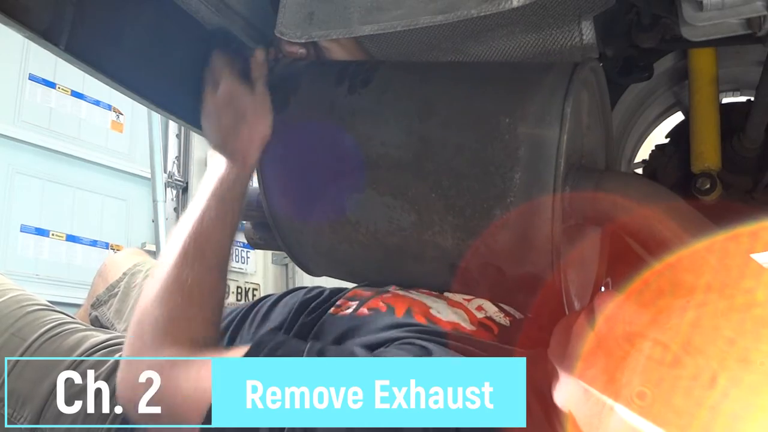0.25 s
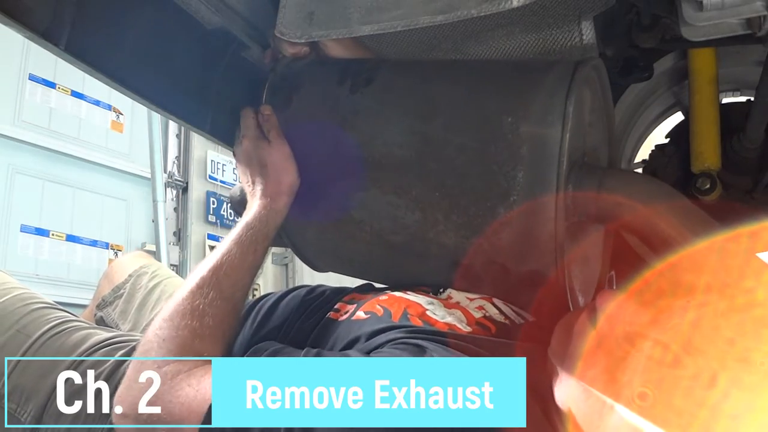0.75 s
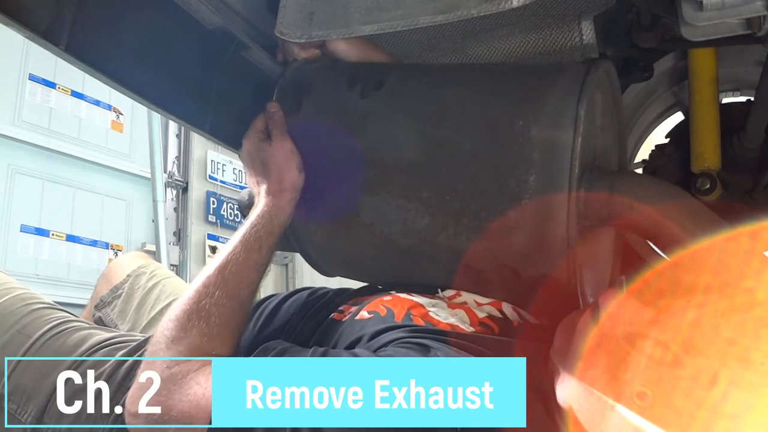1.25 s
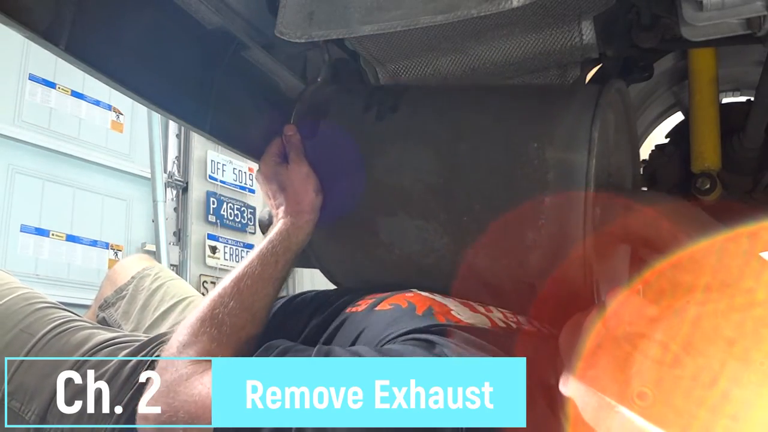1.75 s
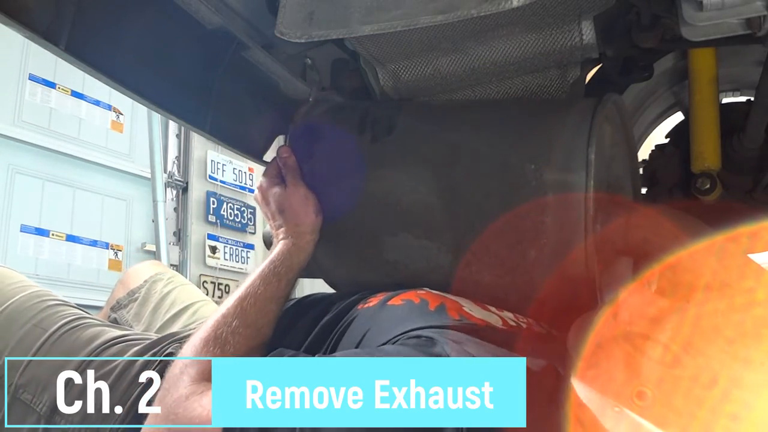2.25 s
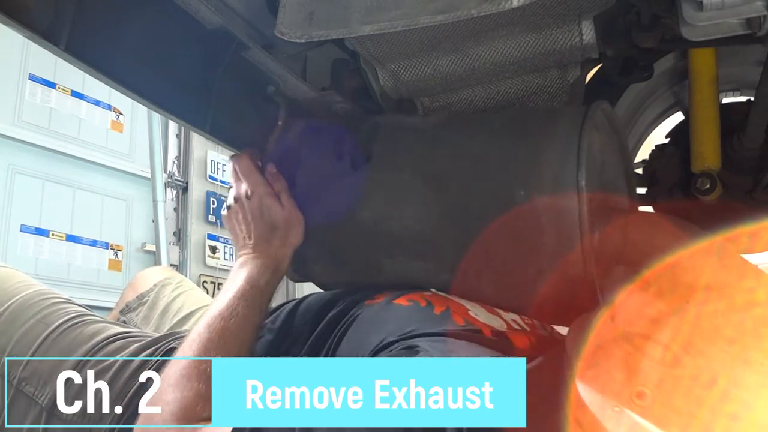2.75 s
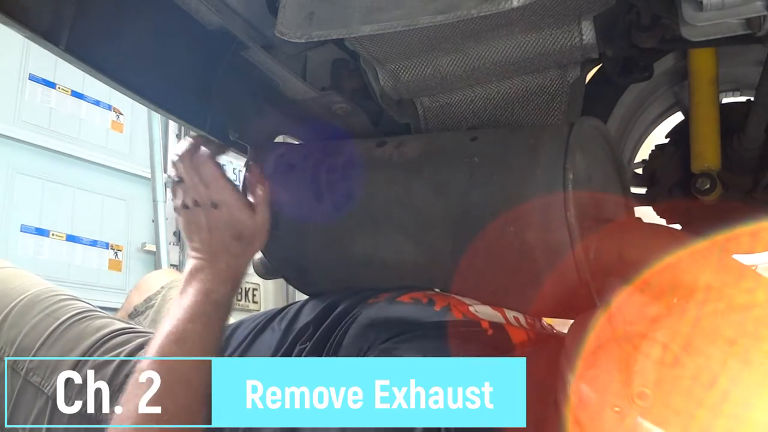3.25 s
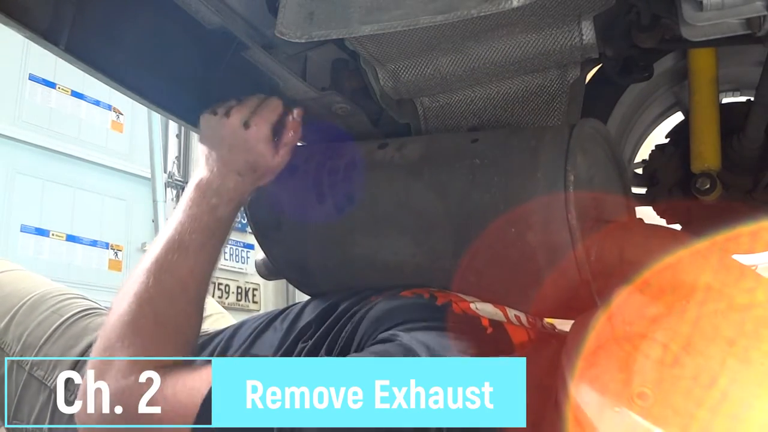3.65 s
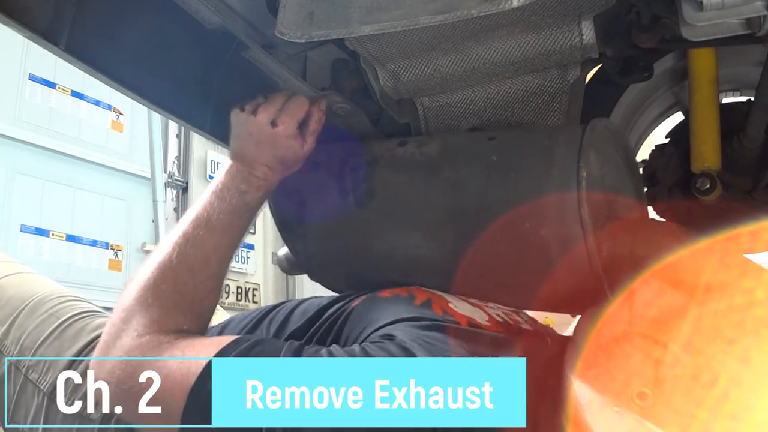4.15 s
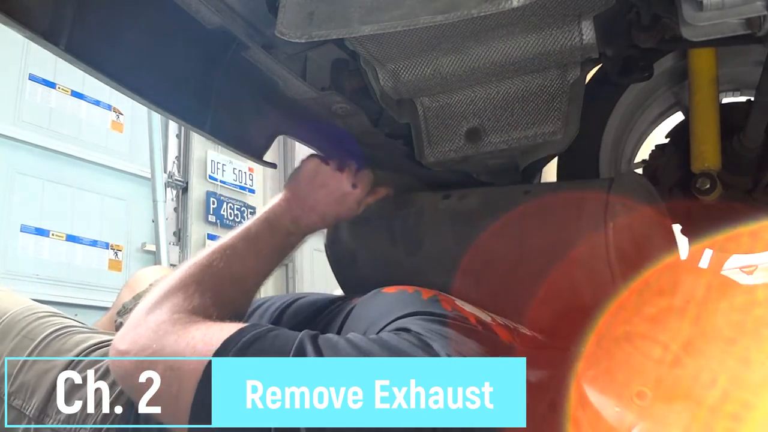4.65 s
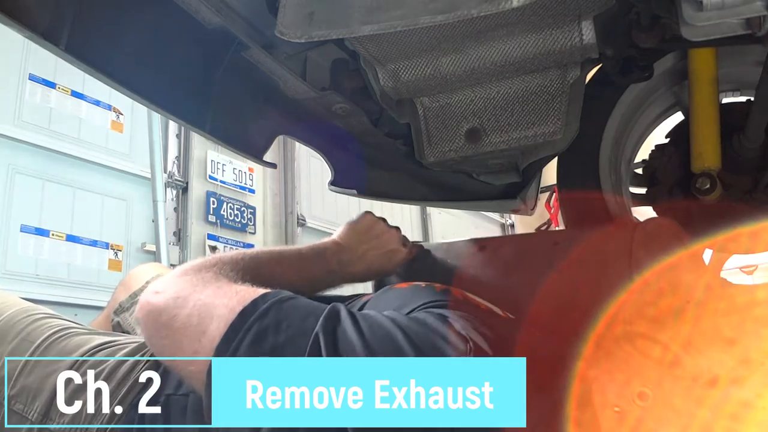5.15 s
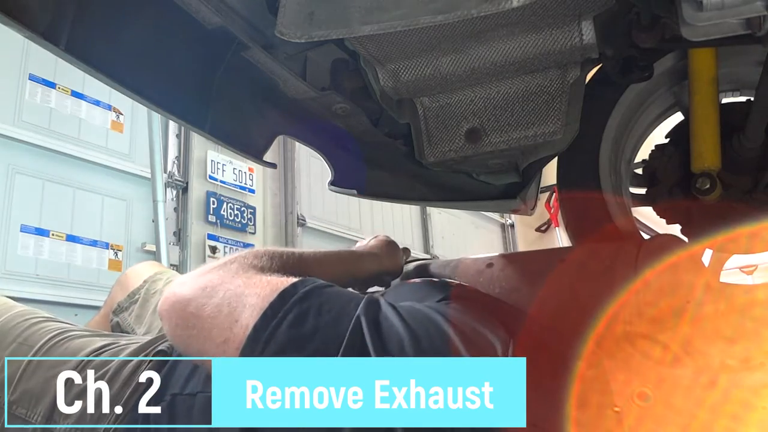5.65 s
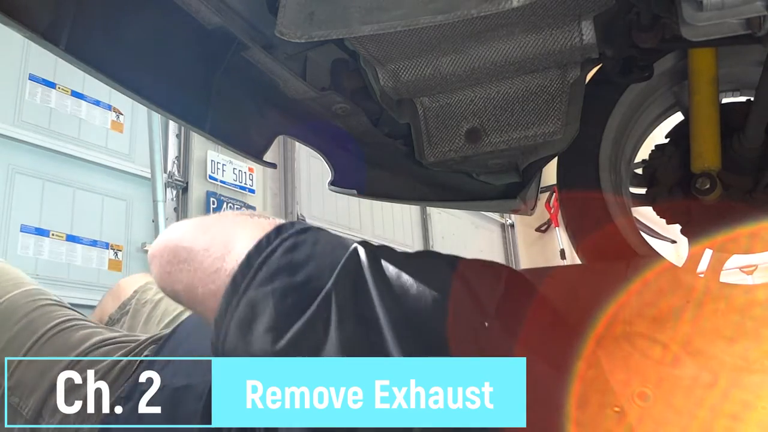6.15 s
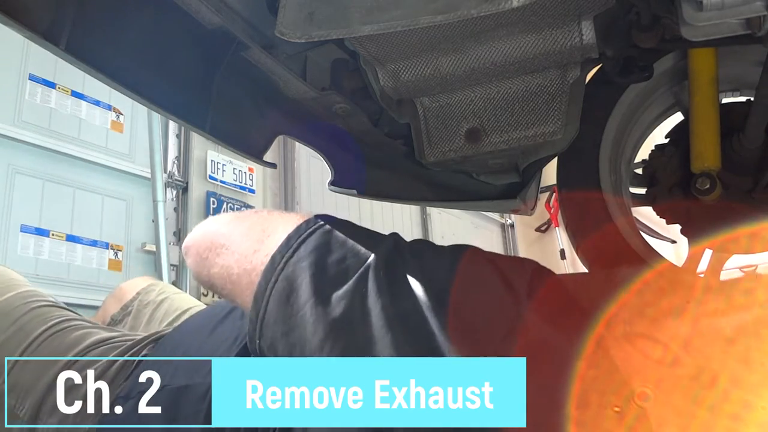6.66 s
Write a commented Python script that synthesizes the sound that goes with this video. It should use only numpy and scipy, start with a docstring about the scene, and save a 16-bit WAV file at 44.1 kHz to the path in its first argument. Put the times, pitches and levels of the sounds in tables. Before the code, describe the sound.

Close up in a garage, rusty metal rubs and rattles as a car's exhaust pipe is worked loose, with bursts of short steel clanks. The clanking gives way to a softer scraping hiss, then the muffler comes free with a low hollow bump. Metal squeaks briefly, and the muffler knocks and scrapes several times as it is set down. A low, steady room rumble lies underneath.

```python
"""Garage, under a raised car: an exhaust pipe and its muffler are worked loose.
Rust grains hiss in the sliding contact and drive the modes of pipe and muffler shell; blows clank
on both, and stick-slip makes single modes squeak. Hands knock the hollow muffler; it drops free,
the pipework shudders, and it is laid down at the end. The room adds low rumble and short reverb."""
import sys
import numpy as np
from scipy import signal
from scipy.fft import rfft, irfft, next_fast_len
from scipy.io import wavfile
from scipy.ndimage import uniform_filter1d

SR = 44100
rng = np.random.default_rng(int(sys.argv[2]) if len(sys.argv) > 2 else 0)


def to_wav(s):
    """Save 16-bit WAV."""
    ch = np.atleast_2d(s).T  # columns
    pcm = np.round(np.clip(ch, -1, 1) * 32767)  # PCM
    wavfile.write(sys.argv[1], SR, pcm.astype(np.int16))


N = 303849

# room tone: f/Hz, level/dB
RUMBLE_SPECTRUM = [(12, 0), (20, -2), (91, 1.5), (150, -3), (459, -14.5), (698, -17.5), (1120, -23.5),
                   (1290, -26.5), (2670, -33), (3250, -31), (3950, -35), (7000, -41.5), (16000, -45)]
# room tone, left-right likeness: f/Hz, correlation
RUMBLE_COHERENCE = [(60, 0.99), (500, 0.34), (2000, 0.59), (12000, 1)]
# reverb decay: f/Hz, t60/s
GARAGE_T60 = [(200, 1), (1000, 0.32), (4000, 0.4), (12000, 0.48)]
# loose pipework: f/Hz, level/dB
SHUDDER_SPECTRUM = [(40, -12), (80, 0), (220, 4), (500, -12), (1600, -19), (2500, -38), (16000, -80)]
# dull knocks on the muffler: t/s, level/dB, f/Hz, t60/s
KNOCKS = [(0.352, -31.5, 234, 0.076), (1.089, -30.5, 330, 0.071), (1.138, -31.5, 335, 0.078),
          (1.162, -27, 144.5, 0.13), (1.18, -29, 208, 0.048), (1.193, -20.5, 320, 0.058),
          (1.243, -18.5, 318, 0.056), (1.288, -30, 293, 0.038), (1.334, -28, 316, 0.035),
          (1.337, -34.5, 142, 0.2), (2.66, -38.5, 251, 0.22), (2.745, -38, 255, 0.27),
          (5.406, -32.5, 112, 0.14), (5.447, -29, 84, 0.095), (6.28, -41.5, 283, 0.13),
          (6.435, -35.5, 97, 0.13), (6.441, -32, 152, 0.17), (6.445, -25, 262, 0.11),
          (6.479, -22, 261, 0.16), (6.595, -34.5, 98.5, 0.25), (6.639, -30.5, 267, 0.17),
          (6.791, -33, 151, 0.19), (6.781, -23.5, 259, 0.23)]
# hollow muffler notes at the drop: f/Hz, level/dB, t60/s
HOLLOW_NOTES = [(64.6, -26.5, 0.096), (158.4, -25, 0.25), (197, -21.5, 0.12), (231, -33, 0.81),
                (305, -33, 0.21), (503, -29.5, 0.15), (680, -52, 0.27), (1116, -41, .15), (1440, -35, 0.24)]
# stick-slip notes: t/s, rise/(s per 20 dB), hold/s, fade/(s per 20 dB), f/Hz, level/dB
SQUEAKS = [(0.055, 0.1, 0.0044, 0.07, 2580, -48), (1.895, .01, 0.039, .06, 1860, -55),
           (1.965, -1, 0.053, -0.4, 3300, -53.5), (1.975, -1.7, 0.027, .04, 1840, -52),
           (2.037, -1.5, 0.016, 0.2, 1150, -52), (3.212, .08, 0.026, 0.12, 3210, -49),
           (3.233, .01, 0.013, 0, 644, -43), (3.246, 0.2, 0.03, 0.02, 1280, -49),
           (3.355, -0.5, 0.003, 0.07, 2090, -47), (3.37, -1, .05, 0.19, 2110, -68),
           (3.722, 0.0441, 0.039, 0.5, 3230, -62.5), (4.546, .006, .004, .01, 530, -43),
           (4.622, .035, .012, .03, 545, -41), (5.821, -0.2, 0.02, -0.4, 3150, -44.5),
           (5.841, 0.03, 0.066, .03, 690, -44), (5.89, .015, 0.1, 0.2, 1345, -36),
           (5.919, .007, .004, .006, 1350, -20), (5.954, .006, .002, .005, 1335, -20),
           (5.964, .008, .008, .02, 1335, -18.5), (5.96, .05, 0.15, 0.5, 522, -50.5),
           (6.136, .05, 0.19, 0.4, 3210, -51.5), (6.214, 4, 0.16, 1, 690, -49)]
# sudden slips: t/s, fade/(s per 20 dB), hiss/dB, pipe/dB, shell/dB
SKIDS = [(0.0, 0.14, -54, -55, -54), (0.595, 0.06, -49.5, -74.5, -80), (0.658, 0.11, -47.5, -42.5, -72),
         (0.821, 0.17, -47, -45, -58), (1.08, 0.4, -53.5, -58, -46), (1.166, 0.21, -41, -46, -37),
         (1.285, 0.1748, -50, -39, -40), (2.095, 0.37, -40.5, -32.5, -57), (2.15, 0.15, -35, -30, -38.5),
         (2.737, 0.42, -40, -33.5, -38), (2.82, 0.04, -35.5, -51, -41), (3.101, 0.04, -56, -56, -43.5),
         (3.6, 0.6, -66, -58.5, -56), (3.734, .13, -66, -68, -68), (5.334, 0.19, -51, -41.5, -39),
         (6.446, 0.22, -41.5, -43, -29), (6.594, 0.4, -66, -30, -22.5), (6.782, 0, -35, -50, -28),
         (6.872, -2, -54, -40, -40)]
# pushes that swell, hold and ease off: t/s, hold/s, hiss/dB, pipe/dB, shell/dB
STROKES = [(.206, .0, -60.5, -76, -79), (.386, .0, -62.5, -84, -80), (0.505, 0, -59, -85, -85),
           (1.554, .0, -57, -70, -69), (1.728, 0, -50, -50, -55), (1.842, 0.18, -57.5, -53.5, -66),
           (2.481, 0.043, -49.5, -40, -66), (2.647, 0.016, -46.5, -39, -43),
           (2.874, 0.075, -66, -41, -41.5), (3.198, 0.032, -51.5, -53, -47.5), (3.984, 0, -49.5, -54, -64),
           (4.088, 0.051, -43.5, -51.5, -74), (4.315, 0.0099, -48, -64, -53.5),
           (4.421, 0.48, -41, -56.5, -55), (4.57, 0.078, -43.5, -52, -63.5),
           (4.993, 0.19, -43, -55.5, -57.5), (5.823, 0.037, -51, -68, -46), (5.906, 0.083, -37.5, -34, -48),
           (6.143, 0.2, -50, -52.5, -47)]
# smooth metal in the contact, brighter than rust: t/s, share of hiss power
SMOOTH_SHARE = [(0, 0.2), (1, 0), (3.3, 0.6), (3.9, 0.16), (5.3, 0.7), (5.8, 0.02), (6.3, 0.47),
                (6.89, 0.8)]
# resonances of smooth sliding: f/Hz, width/Hz, level/dB
SMOOTH_BANDS = [(2120, 180, 9.5), (3230, 340, 10), (4000, 140, -7), (4900, 73, 9), (5780, 190, 4),
                (6800, 140, 4), (6700, 77, 1), (8160, 200, 2), (9140, 150, 3), (10470, 450, 1.5),
                (12100, 240, -2), (13800, 250, -5)]
# broad hiss under them: f/Hz, level/dB
SMOOTH_WASH = [(880, -22), (1500, -42), (3180, 14), (5770, 14.5), (13700, 8), (16000, 2)]
# hiss of rusty contact: f/Hz, level/dB
RUST_SPECTRUM = [(1060, -18), (1800, -17.5), (3060, -4), (3350, -3.5), (4740, -9.5), (7090, -12),
                 (16000, -29)]
# narrow bands ringing in that hiss: f/Hz, width/Hz, boost/dB
RUST_BANDS = [(2326, 49, 11.5), (2840, 27, 1.5), (4380, 39, 9), (5240, 50, 6), (5600, 63, 8),
              (6250, 110, 3), (6300, 32, 8), (7060, 27, -0.5), (8400, 57, 7.5), (9000, 70, 12)]
# modes of the thin pipe and the muffler shell: f/Hz, width/Hz, level/dB
PIPE_MODES = [(962, 8.5, -3), (1090, 65, 12), (1290, 16, 18), (1630, 84, -2), (2550, 150, 18),
              (2610, 80, 13.5), (1876, 48, 14.5), (3230, 250, 12), ]
SHELL_MODES = [(262, 16, -9), (323, 16, -14), (425, 12, -9), (455, 14, -8), (489, 12, -6), (541, 16, -4),
               (577, 12, -4), (664, 16, -2), (689, 12, 0), (862, 12, -7), (953, 14, -3), (1002, 18, -4),
               (1084, 20, -8), (1211, 20, -4), (1271, 20, -4), (1336, 24, -5)]
# their crowds of lesser modes: f/Hz, level/dB
PIPE_WASH = [(290, -36), (500, -23), (755, -13), (898, -0.5), (1820, 3), (2130, 1.5), (8840, -25.5),
             (12000, -39), (15600, -66), (22000, -120)]
SHELL_WASH = [(88, -14), (150, -13), (262, -5), (362, -4.5), (680, 0), (776, -6.5), (981, -4.5),
              (5000, -27), (6500, -76), (11000, -120)]
# crack of first contact: f/Hz, level/dB
TICK_SPECTRUM = [(1060, -34), (1800, -10.5), (3000, -2.5), (4740, -7), (7090, -10), (10000, -12.5),
                 (12500, -34), (16000, -27)]
# steel on steel: t/s, pipe level/dB, shell re pipe/dB, tick re pipe/dB, focus/Hz, grip t60/s
CLANKS = [(0.6489, -36.5, -32, 3.5, 1870, 0.31), (0.661, -33, -25, 2.5, 1300, 0.15),
          (0.7383, -37.5, -37, -5, 1860, 0.31), (0.8114, -35, 3.5, -30, 1230, 0.13),
          (1.0792, -38, -22, 6, 2600, 0.084), (1.1559, -25.5, -21, 11.5, 2690, 0.045),
          (1.2427, -27, -3, -23, 543, 0.097), (1.276, -15.5, -2.5, -18, 2350, 0.031),
          (1.3394, -32, 2.5, -5, 627, 0.11), (1.6868, -43, -20, 2, 1300, 0.1),
          (1.713, -41, -20, -5, 1900, 0.1), (1.7307, -41, -24, 8.5, 1900, 0.081),
          (1.8213, -41.5, -19, 1.5, 1340, 0.16), (1.8948, -43, -27, 1, 1850, 0.1),
          (1.9275, -39, -29, 0, 1830, 0.029), (1.969, -36, -27, -18, 1760, 0.12),
          (2.0155, -34, -20, -8, 1850, 0.08), (2.0873, -21.5, -48, 8, 2300, 0.056),
          (2.1492, -8, -20, -35, 1680, 0.093), (2.255, -26, -2.5, -3.5, 1290, 0.096),
          (2.327, -21, -33, -5, 1830, 0.18), (2.4511, -41, -24, -7, 1300, 0.055),
          (2.4885, -27, -34, -4.5, 1050, 0.082), (2.516, -31, -25, -1, 1850, 0.06),
          (2.5852, -28.5, -9, -4.5, 1350, 0.19), (2.6376, -44, -19.5, 1, 2400, 0.06),
          (2.6445, -30.5, -11, -2.5, 1280, 0.19), (2.7413, -18, -7, -33, 700, 0.068),
          (2.8086, -22, -4, -18, 1290, 0.08), (2.8205, -18, -6.5, -21, 1730, 0.11),
          (2.9258, -19, -9, -7, 1570, 0.05), (2.9966, -22.5, -19, -6, 1680, 0.1),
          (3.098, -39, -18, 2.5, 3170, 0.065), (5.3361, -21, -0.5, -17, 1580, 0.12),
          (6.4396, -23.5, 16.5, -7, 634, 0.18), (6.4515, -30.5, 19.5, -20, 1240, 0.31),
          (6.4791, -32, 18.5, -27, 644, 0.058), (6.5102, -33.5, 20.5, -29, 655, 0.18),
          (6.5935, -21.5, 17.5, -33, 950, 0.24), (6.6242, -25.5, 21, -25, 990, 0.2),
          (6.6593, -32, 20, -43, 666, 0.22), (6.782, -37, 21.5, -9, 1200, 0.15),
          (6.8135, -39, 20, 13, 526, 0.087), (6.843, -45, 14, 6, 690, 0.06),
          (6.87, -26, 22.5, -31, 880, 0.12)]
# position of the work: t/s, left re right/dB
WORK_PAN = [(0, -0.2), (2, -1.54), (3.3, -1.5), (3.6, 0), (6.89, -1.2)]
# stereo width: f/Hz, side gain/dB
SIDE_GAIN = [(60, -13.5), (300, 0.5), (1000, 10), (9500, 9), (12500, -2), (15000, -8)]

HISS, PIPE, SHELL = range(3)  # rubbing layers
IDLE_DB = [-78, -92, -71]  # resting contact, by layer
SLIP_S, SWELL_S, EASE_S = 0.018, 0.088, 0.11  # per 20 dB: skid rise, stroke rise, stroke fade
LINGER = 1.03  # fade time of pipe and shell re hiss
JUDDER_DB, JUDDER_S, PATCHY_DB = 1.6, 0.025, 1.5
PIPE_CONTACT_S, SHELL_CONTACT_S = 0.0076, 0.018  # the soft shell stays in contact longer
DROP_AT_S, PUSH_S, WOBBLE_SHARE = 5.34, 0.0035, 0.03
ROUGH_PER_KHZ, FLUTTER_DB_PER_KHZ = 0.016, 1.8
RUMBLE_DB, SHUDDER_DB, CUTOFF_HZ = -48, -34, 15690


def gain_of(db):
    return 10 ** (np.asarray(db) / 20)


def decay(t, t60_s):
    return gain_of(-60 * t / t60_s)


def unit_rms(x):
    return x / np.sqrt(np.mean(x ** 2) + 1e-20)


def at_hz(points, hz):
    f, value = np.transpose(points)
    return np.interp(np.log(hz + 1), np.log(f + 1), value)


def per_sample(points):
    return np.interp(np.arange(N) / SR, *np.transpose(points))


def add(mix, at_s, sound):
    part = mix[round(at_s * SR):][:len(sound)]
    part += sound[:len(part)]


def coloured(x, spectrum):
    """Filter x by rows of f/Hz, gain/dB."""
    size = next_fast_len(x.shape[-1])
    hz = np.fft.rfftfreq(size, 1 / SR)
    return irfft(rfft(x, size) * gain_of(at_hz(spectrum, hz)), size)[..., :x.shape[-1]]


def swell(t, at_s, rise_s, hold_s, fade_s):
    """Gain: up 20 dB per rise_s until at_s, hold at 1, down 20 dB per fade_s."""
    before = (at_s - t) / max(rise_s, 0.002)
    after = (t - at_s - hold_s) / max(fade_s, 0.004)
    return gain_of(-20 * np.maximum(np.maximum(before, after), 0))


def wander(span_s, shape=N):
    """Random drift, rms 1, changing about every span_s."""
    size = max(round(span_s * SR / 2), 1)
    return unit_rms(uniform_filter1d(uniform_filter1d(rng.standard_normal(shape), size), size))


def patches(noise, bins, frames):
    """Time-frequency noise blurred into patches, rms 1."""
    return unit_rms(uniform_filter1d(uniform_filter1d(noise, bins, 0), frames, 1))


def rumble():
    """Steady low room tone with drifting patches."""
    frames, hz = N // 512 + 5, np.fft.rfftfreq(2048, 1 / SR)
    re, im, other_re, other_im, drift = rng.standard_normal((frames, len(hz), 5)).T
    coherence = at_hz(RUMBLE_COHERENCE, hz)[:, None]
    left = re + 1j * im
    right = coherence * left + np.sqrt(1 - coherence ** 2) * (other_re + 1j * other_im)
    level_db = at_hz(RUMBLE_SPECTRUM, hz)[:, None] + patches(drift, bins=8, frames=8)
    tone = signal.istft(np.array([left, right]) * gain_of(level_db), nperseg=2048, noverlap=1536)[1]
    return gain_of(RUMBLE_DB) * unit_rms(tone[:, :N])


def garage(x):
    """Reverb: sparse reflections, mostly alike left and right, each band with its own t60."""
    taps = np.zeros((3, SR))  # common, left, right
    slots = np.arange(300, SR - 20, 20)
    arrivals = slots + rng.integers(0, 20, (3, len(slots)))
    np.put_along_axis(taps, arrivals, rng.choice([-1., 1.], arrivals.shape), 1)
    hz, t, bands = signal.stft(taps[0] + 0.21 * taps[1:], SR, nperseg=256)
    tail = signal.istft(bands * decay(t, at_hz(GARAGE_T60, hz)[:, None]), SR, nperseg=256)[1]
    return signal.fftconvolve(x, tail / np.linalg.norm(tail[0]), axes=1)[:, :N]


def grit(rate_hz, spread_db):
    """Rust grains catching at random, a few of them large."""
    size = gain_of(spread_db * np.minimum(rng.exponential(1, N), 5)) * rng.standard_normal(N)
    return unit_rms(size * (rng.random(N) < rate_hz / SR))


def shudder():
    """The loose pipework shakes after the drop: a rough low tail."""
    rough = unit_rms(coloured(grit(rate_hz=440, spread_db=3.7), SHUDDER_SPECTRUM))
    envelope = swell(np.arange(N) / SR, DROP_AT_S + 0.0078, rise_s=0.006, hold_s=0, fade_s=0.24)
    return gain_of(SHUDDER_DB) * envelope * rough


def knocks():
    """A soft push sounds one hollow note, the drop a whole set. The hand-held shell wobbles in pitch."""
    out, t = np.zeros(N), np.arange(SR // 2) / SR
    drop = [(DROP_AT_S, db, hz, t60_s) for hz, db, t60_s in HOLLOW_NOTES]
    for at_s, db, hz, t60_s in KNOCKS + drop:
        envelope = (1 - np.exp(-t / PUSH_S)) ** 2 * decay(t, t60_s)
        cycles = np.cumsum(hz * (1 + WOBBLE_SHARE * wander(0.012, len(t)))) / SR
        add(out, at_s, gain_of(db) * envelope / envelope.max() * np.sin(2 * np.pi * cycles))
    return out


def squeaks():
    """Stick-slip keeps one mode singing; roughness and flutter grow with pitch."""
    out, t, lead_s = np.zeros(N), np.arange(SR // 2) / SR, 0.05
    for at_s, rise_s, hold_s, fade_s, hz, db in SQUEAKS:
        khz = hz / 1000
        pitch_drift, level_drift = wander(15 / hz, (2, len(t)))
        cycles = np.cumsum(hz * (1 + ROUGH_PER_KHZ * khz * pitch_drift)) / SR
        level = gain_of(db + FLUTTER_DB_PER_KHZ * khz * np.minimum(level_drift, 1))
        envelope = swell(t, lead_s, rise_s, hold_s, fade_s) * signal.windows.tukey(len(t), 0.1)
        add(out, at_s - lead_s, np.sqrt(2) * level * envelope * np.sin(2 * np.pi * cycles))
    return out


def contact(layer, fade_scale=1):
    """Drive of one layer: skids and strokes over resting contact. Rust catches and lets go unevenly."""
    t = np.arange(0, N / SR + 0.002, 0.001)
    skid_power = sum((gain_of(db[layer]) * swell(t, at_s, SLIP_S, 0, fade_s * fade_scale)) ** 2
                     for at_s, fade_s, *db in SKIDS)
    stroke_power = sum((gain_of(db[layer]) * swell(t, at_s, SWELL_S, hold_s, EASE_S * fade_scale)) ** 2
                       for at_s, hold_s, *db in STROKES)
    drive = np.sqrt(skid_power + stroke_power + gain_of(IDLE_DB[layer]) ** 2)
    judder = gain_of(JUDDER_DB * (1 - per_sample(SMOOTH_SHARE)) * (wander(JUDDER_S) - 0.3))
    return judder * np.interp(np.arange(N) / SR, t, drive)


def patchy(x):
    """The contact spot wanders, so the colour shifts."""
    bands = signal.stft(x, nperseg=512)[2]
    shift_db = PATCHY_DB * patches(rng.standard_normal(bands.shape[::-1]).T, bins=5, frames=10)
    return unit_rms(signal.istft(bands * gain_of(shift_db), nperseg=512)[1][:N])


def resonance(hz, centre_hz, width_hz):
    return 1 / (1 + (2 * (hz - centre_hz) / width_hz) ** 2)


def sliding():
    """Fine dense grains hiss through the bands of smooth metal and of rust."""
    hz = np.geomspace(200, 20000, 1500)
    bands = sum(gain_of(db) * resonance(hz, *band) for *band, db in SMOOTH_BANDS)
    wash_db = at_hz(SMOOTH_WASH, hz)
    smooth_db = 20 * np.log10(bands + gain_of(wash_db - 11))
    smooth_db += np.minimum(wash_db + 15, 0)  # keeps band skirts out of the bass
    rust_db = at_hz(RUST_SPECTRUM, hz) + sum(db * resonance(hz, *band) for *band, db in RUST_BANDS)
    smooth = unit_rms(coloured(grit(rate_hz=9000, spread_db=1.04), np.transpose([hz, smooth_db])))
    rusty = unit_rms(coloured(grit(rate_hz=5000, spread_db=0.91), np.transpose([hz, rust_db])))
    share = per_sample(SMOOTH_SHARE)
    return contact(HISS) * patchy(np.sqrt(share) * smooth + np.sqrt(1 - share) * rusty)


def steel_ring(modes, wash, wash_db, wash_t60_s, focus_hz=1000, focus_db=0):
    """Impulse response of a steel part, energy 1: main modes over a dying crowd of lesser ones."""
    hz, width_hz, db = np.transpose(modes)[:, :, None]
    t = np.arange(6000) / SR
    spot_db = -focus_db * np.minimum(abs(np.log2(hz / focus_hz)), 1)  # struck spot favours nearby modes
    size = gain_of(db + spot_db) * np.sqrt(width_hz) * rng.choice([-1, 1], hz.shape)
    tones = (size * np.exp(-np.pi * width_hz * t) * np.sin(2 * np.pi * hz * t)).sum(0)
    crowd = coloured(rng.standard_normal(len(t)), wash) * decay(t, wash_t60_s)
    response = tones / np.linalg.norm(tones) + gain_of(wash_db) * crowd / np.linalg.norm(crowd)
    response *= 1 - np.exp(-t / 0.00016)  # each ring swells in over a fraction of a millisecond
    return response / np.linalg.norm(response)


def rubbing():
    """Rust grains drive the pipe and the shell."""
    pipe_force = contact(PIPE, LINGER) * patchy(grit(rate_hz=2500, spread_db=1.7))
    pipe = signal.oaconvolve(pipe_force, steel_ring(PIPE_MODES, PIPE_WASH, wash_db=9, wash_t60_s=0.17))
    shell_force = contact(SHELL, LINGER) * grit(rate_hz=2500, spread_db=3.5)
    shell_ring = steel_ring(SHELL_MODES, SHELL_WASH, wash_db=-2, wash_t60_s=0.6)
    return pipe[:N] + signal.oaconvolve(shell_force, shell_ring)[:N]


def clanks():
    """Each blow chatters, ticks and rings pipe and shell; the grip damps them."""
    out, t = np.zeros(N), np.arange(6000) / SR
    for at_s, db, shell_db, tick_db, hz, t60_s in CLANKS:
        pipe = steel_ring(PIPE_MODES, PIPE_WASH, wash_db=8.1, wash_t60_s=0.07, focus_hz=hz, focus_db=36)
        shell = steel_ring(SHELL_MODES, SHELL_WASH, wash_db=-6.5, wash_t60_s=0.27,
                           focus_hz=hz, focus_db=15.7)
        tick = unit_rms(coloured(rng.standard_normal(len(t)), TICK_SPECTRUM)) * decay(t, t60_s=0.089)
        shell_share = 1 / (1 + gain_of(-shell_db))
        contact_s = PIPE_CONTACT_S + (SHELL_CONTACT_S - PIPE_CONTACT_S) * shell_share
        chatter = 0.06 * rng.standard_normal(len(t)) * np.exp(-t / contact_s)
        chatter[0] = 1  # first contact
        damped = np.array([pipe, shell, tick]) * decay(t, t60_s)
        parts = signal.fftconvolve(damped, chatter[None], axes=1)
        parts /= abs(parts).max(1, keepdims=True)
        add(out, at_s, gain_of(db) * gain_of([0, shell_db, tick_db]) @ parts)
    return out


def scene():
    """Panned steel, centred thuds, reverb and room tone."""
    pan_db = per_sample(WORK_PAN)
    steel = (rubbing() + sliding() + clanks() + squeaks()) * gain_of([pan_db / 2, -pan_db / 2])
    thuds = knocks() + shudder()
    reverb = garage(gain_of(-9) * steel + gain_of(-17) * thuds)
    return steel + thuds + reverb + rumble()


def record(dry):
    """Two close microphone ports, bass and top treble almost alike; soft clip; low-pass."""
    mid, side = dry.mean(0), coloured((dry[0] - dry[1]) / 2, SIDE_GAIN)
    clipped = 0.75 * np.tanh(np.array([mid + side, mid - side]) / 0.75)
    lowpass = signal.firwin(1023, CUTOFF_HZ, window=("kaiser", 9), fs=SR)
    return signal.oaconvolve(clipped, lowpass[None], "same")


dry = scene()
out = record(dry)
to_wav(out)
```